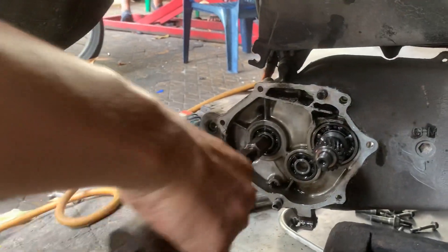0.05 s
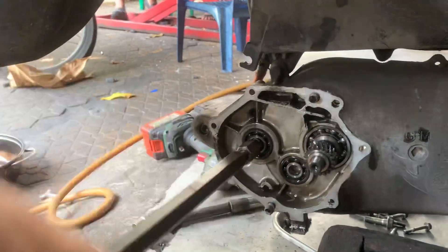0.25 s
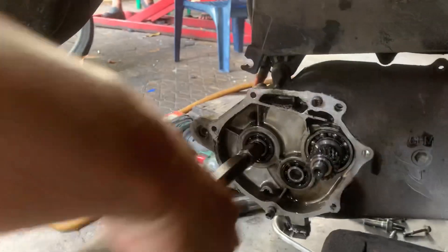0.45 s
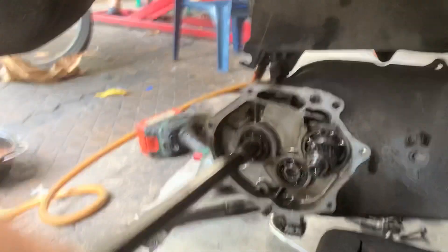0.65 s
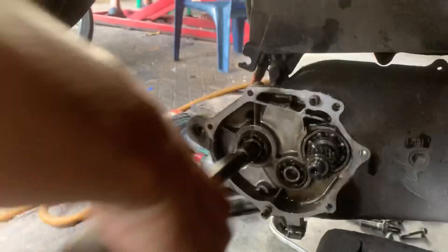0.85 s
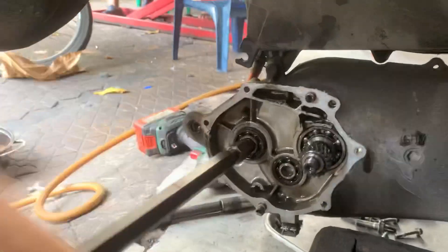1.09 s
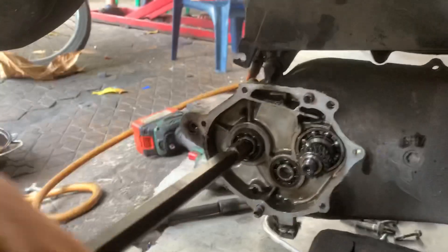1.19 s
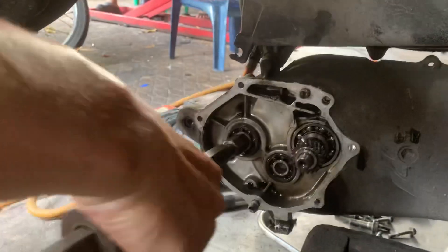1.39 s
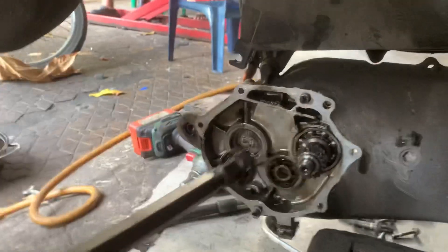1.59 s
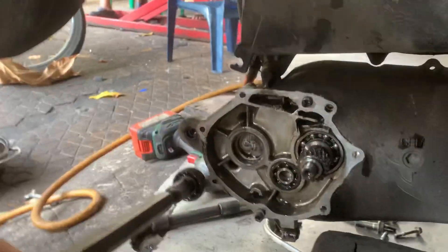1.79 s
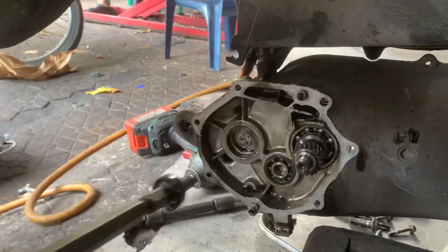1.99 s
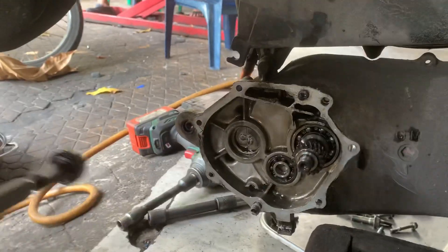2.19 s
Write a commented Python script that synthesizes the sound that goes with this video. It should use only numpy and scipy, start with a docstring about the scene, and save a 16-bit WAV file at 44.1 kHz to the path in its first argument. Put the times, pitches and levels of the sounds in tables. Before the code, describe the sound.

Four steel clangs of a slide hammer on an engine casing, with sliding scrapes between.

```python
"""A slide hammer pulls a bearing from an aluminium engine casing in four blows, close by in a workshop.
The steel weight scrapes along its rod by sliding friction and cracks against its stop; each impact
drives the damped modes of rod, casing and engine mounts: a clang, a rattle and a thud.
Between blows the weight slides back and the loose puller knocks and clinks; at last the freed bearing
jingles. The room reverberates over a low hum."""
import sys
import numpy as np
from scipy import signal
from scipy.fft import rfft, irfft
from scipy.io import wavfile
from scipy.ndimage import uniform_filter1d

SR = 44100
rng = np.random.default_rng(int(sys.argv[2]) if len(sys.argv) > 2 else 0)


def master_out(mix):
    """Clip the mix to full scale and print it as 16-bit PCM to the path in sys.argv[1]."""
    frames = np.transpose(np.atleast_2d(mix))
    ceiling = np.clip(frames, -1, 1)
    pcm = np.round(ceiling * 32767).astype(np.int16)
    wavfile.write(sys.argv[1], SR, pcm)


N = 99225
T = np.arange(N) / SR

# impacts on the stop: (time [s], crack [dB], swell before it [dB], clang [dB], clang t60 [s],
# rattle [dB], rattle t60 [s], casing ring [dB], thud [dB], casing rise time [s])
BLOWS = [(0.243, -11, -10, -11.5, 0.034, -11.5, 0.03, -20, -14.5, 0.0022),
         (0.64, -12.5, -10.5, -7.5, 0.044, -25.5, 0.062, -33, -19, 0.0014),
         (1.0950, -10, -25.5, -12, 0.084, -28, 0.07, -22.5, -45, 0.01),
         (1.4993, -10, -16.5, -14.5, 0.057, -35, 0.066, -30.5, -29.5, .002)]
# spectra of a blow's crack, clang and rattle: (frequency [Hz], level [dB])
CRACK_SPECTRUM = [(40, -45.5), (200, -36), (1500, -17), (4000, -6), (7000, -9.5), (8500, 13), (9500, 0),
                  (11000, 5), (11900, -25), (14000, -3), (16000, -20)]
CLANG_SPECTRUM = [(40, -42), (150, -14), (700, -3.5), (1600, -4.5), (2400, 1), (3700, 1), (7000, 0),
                  (8500, 3), (9400, -12.5), (11000, -14), (11900, -24.5), (14000, -13), (16000, -26.5)]
RATTLE_SPECTRUM = [(30, -27.5), (70, -16), (200, -10), (420, 6.5), (650, 1.5), (900, 5.5), (1200, 9),
                   (1500, -5), (1900, 1), (3000, -6.5), (8000, -31.5)]
# modes of rod and weight, casing, engine on its mounts, bearing: (frequency [Hz], level [dB], t60 [s])
ROD_MODES = [(1190, -8.5, .04), (1606, -13, .04), (2464, -1.5, .06), (2690, -4.5, 0.04), (3620, 0.5, 0.064),
             (3730, 4, 0.062), (3815, -2, 0.075), (5090, -9.5, .04), (5800, -4.5, 0.084), (6270, -8, 0.12),
             (6840, -5.5, 0.046), (8300, -3.5, .04), (8560, -6.5, .045)]
CASING_MODES = [(190, -4.5, 0.04), (308, -5, 0.092), (525, -5, 0.05), (881.4, 3, 0.047), (1250, -9.5, 0.06),
                (1896, -1.5, 0.059), (2716, -5, 0.06)]
MOUNT_MODES = [(129, -4, 0.034), (185, -1.5, 0.043), (287, 2.5, 0.034), (498.6, -10, 0.038)]
BEARING_MODES = [(1680, -14.5, .05), (2445, 0, 0.059), (2537, 0, 0.073), (3152, -11, 0.0324),
                 (4580, -9, 0.044)]
# friction of weight on rod, one envelope a stroke: (time [s], level [dB])
STROKES = [
    [(0, -50), (.04, -44), (.06, -53), (.1, -41.5), (.145, -61.5), (.19, -31), (.21, -31.5), (.238, -26)],
    [(.415, -71), (.44, -29.5), (.455, -45.5), (.472, -30), (.5, -45), (.53, -52), (.56, -62.5),
     (.59, -36.5), (.636, -24.5)],
    [(.82, -54.5), (.845, -48.5), (.87, -45), (.9, -42), (.95, -74.5), (.98, -50), (1.02, -46.5),
     (1.06, -48), (1.09, -42)],
    [(1.17, -51.5), (1.215, -43), (1.25, -57), (1.32, -46.5), (1.345, -58.5), (1.365, -39.5), (1.405, -67),
     (1.445, -45.5), (1.49, -44)],
]
# wavering metal tones: (centre time [s], half duration [s], frequency [Hz], bandwidth [Hz], level [dB])
METAL_TONES = [(0.203, 0.0294, 1519, 200, -41.5), (0.2225, 0.00763, 3695, 60, -21),
               (0.197, 0.01635, 3650, 100, -38.5), (0.444, 0.0082, 3570, 120, -29),
               (0.468, 0.027, 1201, 170, -34.5), (0.473, 0.039, 2457, 59.06, -39),
               (0.613, 0.03, 2473, 89.93, -33), (0.622, 0.014, 3700, 150, -28.5),
               (0.85, 0.055, 849, 60, -46.5), (0.851, 0.014, 3977, 110, -35.5),
               (0.877, 0.025, 2780, 250, -42.5), (1.025, 0.027, 833, 99.3, -46.5),
               (1.112, .013, 883, 45.1, -25), (1.109, .008, 1540, 40.1, -27),
               (1.32, 0.019, 3870, 108.2, -47.5), (1.361, 0.012, 2620, 130, -40)]
# contacts of the loose weight and jaws: (time [s], level [dB], t60 [s])
CLINKS = [(0.099, -60, 0.035), (0.188, -45, .04), (0.217, -27.5, 0.054), (0.442, -29.5, 0.0127),
          (0.459, -41, 0.014), (0.587, -35, 0.049), (0.611, -26.5, 0.043), (0.839, -32.5, 0.064),
          (0.864, -43, 0.047), (0.916, -41.5, 0.036), (0.979, -52, .04), (1.004, -41, 0.07),
          (1.0759, -22.5, 0.025), (1.175, -43, .025), (1.21, -44, .06), (1.278, -38, 0.045),
          (1.360, -43, .04), (1.467, -32, 0.09), (1.475, -29.5, 0.04)]
# jaws striking the casing: (time [s], level [dB], pitch factor [1])
KNOCKS = [(0.7744, -29.5, 0.91), (1.113, -21.5, 0.98), (1.3744, -26.5, 0.98)]
# freed bearing striking the puller: (time [s], level [dB])
JINGLES = [(1.604, -52), (1.657, -66), (1.673, -49), (1.6852, -45.5), (1.738, -56.5)]
# envelope of the engine's grumble: (time [s], level [dB])
GRUMBLE_ENVELOPE = [(0, -53.5), (0.3, -52.5), (0.4, -56), (0.6, -48.5), (0.72, -59), (0.95, -52),
                    (1.2, -51.5), (1.4, -63), (1.6, -72)]
# spectra of the lesser noises and the reverberation: (frequency [Hz], level [dB])
SCRAPE_SPECTRUM = [(100, -15.5), (450, -16.5), (650, -8.5), (900, 2.5), (1400, 4), (2000, -2.5), (2600, 2),
                   (3800, -9.5), (4600, -7.5), (7000, -14), (8600, -15), (9600, -23), (11100, -17),
                   (12000, -48), (14200, -22.5), (16000, -51.5)]
CLINK_SPECTRUM = [(200, -14), (900, -9.5), (2500, 0), (3800, 3), (5000, -3), (8500, -5.5), (9600, -17),
                  (11100, -9), (12000, -36), (14200, -21.5), (16000, -29.5)]
KNOCK_SPECTRUM = [(60, -31.5), (140, -11), (300, 3.5), (680, -4.5), (870, -0.5), (1200, 9.5), (1500, -5.5),
                  (1870, -15), (2800, -21), (6000, -18.5), (12000, -51.5)]
GRUMBLE_SPECTRUM = [(25, -20), (70, 3), (140, 1.5), (220, -7.5), (320, -3.5), (450, -16.5), (850, -3),
                    (1600, -31.5), (5000, -50.5)]
RUMBLE_SPECTRUM = [(25, -19.5), (102, -7), (130, -17), (206, -12.5), (249, -27.5), (285, -22.5), (405, -31),
                   (476, -24.5), (660, -30), (8360, -41), (16000, -60)]
ROOM_SPECTRUM = [(100, -23.5), (500, -23), (1000, -24.5), (2500, -22), (3700, -24.5), (6000, -26),
                 (7500, -31.5), (8500, -24.5), (11000, -28), (12000, -41), (14000, -22.5), (15500, -43.5)]
# reverberation time of the workshop: (frequency [Hz], t60 [s])
ROOM_T60 = [(100, 0.4), (500, 0.85), (2500, 1.03), (8500, 0.82), (12000, 0.44)]
# partials of the hum: (frequency [Hz], level [dB])
HUM_PARTIALS = [(97, -65.5), (199, -72.5)]
# level difference between the channels: (frequency [Hz], left minus right [dB])
BALANCE = [(100, -2.5), (700, -3), (1100, 4.5), (1500, -1.5), (4000, 0.5), (6200, -6.5), (8500, -2.5),
           (15000, 0.5)]
# phase difference of the ringing parts: (frequency [Hz], left lead [rad])
RING_PHASE = [(300, -0.055), (900, 1.1), (1200, -1.2), (1870, -1.1), (2460, -1.6), (2690, 1.5), (3700, 1.1),
              (8300, 0.62)]

CRACK_T60_S, SNAP_S, SNAP_DB = 0.035, 0.0023, -1.5
SWELL_RISE_S, CLANG_RISE_S, CLINK_RISE_S = 0.0052, 0.001, 0.0017
THUD_DELAY_S, THUD_CUT_HZ = 0.0018, 92
ROD_BLOW_DB, ROD_SLIDE_DB, ROD_CLINK_DB = -8, -9, -6.5
CATCHES_PER_S, SCRAPE_DB, GRIT_DB, GRIT_S = 3600, -4.5, 3.2, 0.003
FLUTTER_DEPTH, FLUTTER_S = 0.47, 0.0036
KNOCK_TONE_DB, KNOCK_NOISE_DB, JINGLE_NOISE_DB = -8.5, -2.5, -5
ECHO_S, ECHO_SPREAD_S, ECHO_DB = 0.043, 0.02, -23.5
RUMBLE_DB, HUM_WAVER = -57.5, 0.16
# delays of the right channel behind the left
PAIR_LAG_S, CASING_LAG_S, CRACK_LAG_S, TREBLE_LAG_S = 0.0004255, 0.00022, -0.00032, -0.000295
TREBLE_HZ, LOW_CUT_HZ, HIGH_CUT_HZ = 8000, 21, 16200


def hammer_blows():
    """Impact excitation: a brief noisy swell rises to a crack; steel clangs, casing rattles and thuds."""
    crack, clang, rattle, shake, thud = np.zeros((5, N))
    for (s, crack_db, swell_db, clang_db, clang_t60,
         rattle_db, rattle_t60, ring_db, thud_db, rise_s) in BLOWS:
        t = T - s
        snap = amp(SNAP_DB) * (t >= 0) * np.exp(-(t / SNAP_S) ** 2) / 2
        crack += amp(crack_db) * (amp(-3) * decay(t, CRACK_T60_S) + snap)
        clang += amp(swell_db) * np.exp(-abs(t) / np.where(t < 0, SWELL_RISE_S, CLANG_RISE_S))
        clang += amp(clang_db) * decay(t, clang_t60) * (1 - np.exp(-np.maximum(t, 0) / CLANG_RISE_S))
        jolt = np.clip(t / rise_s, 0, 1) ** 2 * decay(np.maximum(t - rise_s, 0), rattle_t60)
        rattle += amp(rattle_db) * jolt
        shake += amp(ring_db) * jolt
        for hz, db, t60 in MOUNT_MODES:
            thud += amp(thud_db + db) * damped_sine(t - THUD_DELAY_S, hz, t60)
    steel = colour(crack * stereo_noise(0.94, CRACK_LAG_S), CRACK_SPECTRUM)
    steel += colour(clang * stereo_noise(), CLANG_SPECTRUM)
    steel += amp(ROD_BLOW_DB) * resonate(clang * stereo_noise(lag_s=0), ROD_MODES)
    casing = colour(rattle * stereo_noise(0.51, CASING_LAG_S), RATTLE_SPECTRUM)
    casing += resonate(shake * rng.standard_normal(N), CASING_MODES)
    engine = stereo(highpass(thud, THUD_CUT_HZ), lag_s=CASING_LAG_S)
    return steel + casing + engine


def weight_scrapes():
    """Sliding friction: tiny random catches between weight and rod excite the rod's modes."""
    level = sum(amp(np.interp(T, *np.transpose(stroke), left=-200, right=-200)) for stroke in STROKES)
    catches = unit_rms(rng.standard_normal((3, N)) * (rng.random((3, N)) < CATCHES_PER_S / SR))
    grit = unit_rms(uniform_filter1d(rng.standard_normal(N), round(GRIT_S * SR)))
    force = level * unit_rms(amp(GRIT_DB * grit))
    scrape = colour(force * stereo(catches[0], catches[1:], coherence=0.29), SCRAPE_SPECTRUM)
    rod = resonate(colour(force * catches[0], SCRAPE_SPECTRUM), ROD_MODES)
    return amp(SCRAPE_DB) * scrape + amp(ROD_SLIDE_DB) * rod


def metal_tones():
    """Brief, randomly modulated resonances: sliding squeals and the third blow's hollow clank."""
    out = np.zeros((2, N))
    for s, half_s, hz, width_hz, db in METAL_TONES:
        near = abs(T - s) < np.pi * half_s
        jitter, flutter = rng.standard_normal((2, N))[:, near]
        # a random walk in phase broadens the spectral line
        phase = np.cumsum(uniform_filter1d(jitter, size=32)) * np.sqrt(2 * np.pi * width_hz / SR)
        flutter = unit_rms(uniform_filter1d(flutter, round(FLUTTER_S * SR)))
        swell = amp(db) * np.exp(-((T[near] - s) / half_s) ** 2)
        out[:, near] += swell * (1 + FLUTTER_DEPTH * flutter) * partial(T[near], hz, phase)
    return out


def puller_clinks():
    """Brief steel-on-steel contacts give broadband forces that set the rod in free vibration."""
    force = sum(amp(db) * np.where(T < s, np.exp(-abs(T - s) / CLINK_RISE_S), decay(T - s, t60))
                for s, db, t60 in CLINKS)
    contact = colour(force * stereo_noise(), CLINK_SPECTRUM)
    return contact + amp(ROD_CLINK_DB) * resonate(force * stereo_noise(lag_s=0), ROD_MODES)


def jaw_knocks():
    """Modal superposition: the jaws shift in their seat and sound the casing's damped modes."""
    tone = np.zeros(N)
    for s, db, pitch in KNOCKS:
        for k, (hz, mode_db, t60) in enumerate(CASING_MODES):
            tone += (-1) ** k * amp(db + mode_db) * damped_sine(T - s, hz * pitch, t60)
    burst = sum(amp(db) * decay(T - s, t60=0.055) for s, db, _ in KNOCKS) * stereo_noise(0.59)
    return amp(KNOCK_TONE_DB) * stereo(tone) + amp(KNOCK_NOISE_DB) * colour(burst, KNOCK_SPECTRUM)


def bearing_jingles():
    """Free vibration: the loose bearing ticks against the tool and rings at its natural frequencies."""
    burst = sum(amp(db) * decay(T - s, t60=0.043) for s, db in JINGLES) * stereo_noise()
    tone = sum(amp(db + mode_db) * decay(T - s, t60) * partial(T - s, hz, 0)
               for s, db in JINGLES for hz, mode_db, t60 in BEARING_MODES)
    return tone + amp(JINGLE_NOISE_DB) * colour(burst, CLINK_SPECTRUM)


def engine_grumble():
    """Forced vibration: the engine radiates low noise as it is tugged about."""
    level = amp(np.interp(T, *np.transpose(GRUMBLE_ENVELOPE)))
    return level * colour(stereo_noise(0.9), GRUMBLE_SPECTRUM)


def wall_echo(x):
    """Scattering at a wall spreads one reflection over time."""
    taps = rng.standard_normal((2, SR // 4)) * np.exp(-((T[:SR // 4] - ECHO_S) / ECHO_SPREAD_S) ** 2)
    return amp(ECHO_DB) * convolve(x, taps / np.linalg.norm(taps[0]))


def reverberation(x, tails=3):
    """A diffuse field decays at its own rate in each band; crossfaded tails avoid fixed ringing."""
    out = np.zeros((2, N))
    onset = np.clip(T[:SR // 2] / 0.01, 0, 1)
    for k in range(tails):
        hz, t, bands = signal.stft(rng.standard_normal((2, SR)), SR, nperseg=256)
        t60 = lookup(ROOM_T60, hz)[:, None]
        gain = amp(lookup(ROOM_SPECTRUM, hz))[:, None] * np.sqrt(2 * np.log(1000) / (t60 * SR))
        tail = signal.istft(bands * decay(t, t60) * gain, SR, nperseg=256)[1][:, :SR // 2]
        crossfade = np.cos(2 * np.pi * T + np.pi * k / tails) * np.sqrt(2 / tails)
        out += convolve(x * crossfade, tail * onset)
    return out


def workshop_hum():
    """Slow amplitude and phase modulation makes a hum waver over a low rumble."""
    hum = np.zeros(N)
    for hz, db in HUM_PARTIALS:
        drift = np.interp(T, np.linspace(0, T[-1], 30), rng.standard_normal(30))
        hum += amp(db) * np.sqrt(2) * (1 + HUM_WAVER * drift) * np.sin(2 * np.pi * hz * T + drift)
    return hum + amp(RUMBLE_DB) * unit_rms(colour(stereo_noise(0.3), RUMBLE_SPECTRUM))


def amp(db):
    """Amplitude ratio of a level in decibels."""
    return 10 ** (np.asarray(db) / 20)


def unit_rms(x):
    """Normalisation to unit power."""
    return x / np.sqrt(np.mean(x ** 2) + 1e-20)


def lookup(points, hz):
    """Interpolation on a log-frequency axis."""
    f, value = np.transpose(points)
    return np.interp(np.log(hz + 1), np.log(f + 1), value)


def convolve(x, response):
    """Linear response of each channel, by convolution."""
    return signal.oaconvolve(np.atleast_2d(x), np.atleast_2d(response), axes=1)[:, :N]


def highpass(x, hz):
    """Second-order attenuation below a cutoff."""
    return signal.sosfilt(signal.butter(2, hz, "high", fs=SR, output="sos"), x)


def colour(x, spectrum, size=4096):
    """Spectral shaping by a causal filter of unit energy."""
    log_gain = np.log(amp(lookup(spectrum, abs(np.fft.fftfreq(size, 1 / SR)))))
    response = np.fft.ifft(np.exp(np.conj(signal.hilbert(log_gain)))).real[:size // 2]
    return convolve(x, response / np.linalg.norm(response))


def decay(t, t60):
    """Exponential damping from t = 0, by 60 dB in t60 seconds."""
    return (t >= 0) * np.exp(-np.log(1000) * np.clip(t / t60, 0, 10))


def damped_sine(t, hz, t60):
    """Impulse response of a damped oscillator."""
    return decay(t, t60) * np.sin(2 * np.pi * hz * t)


def partial(t, hz, phase):
    """One resonance reaches the two microphones with a phase difference."""
    return np.sin(2 * np.pi * hz * t + phase - np.array([[0], [1]]) * lookup(RING_PHASE, hz))


def resonate(force, modes):
    """Forced response of damped modes with random phases."""
    t = T[:SR // 5]
    response = sum(amp(db) * decay(t, t60) * partial(t, hz, rng.uniform(0, 2 * np.pi))
                   for hz, db, t60 in modes)
    return convolve(force, response / np.linalg.norm(response[0]))


def stereo(direct, diffuse=0, coherence=1, lag_s=PAIR_LAG_S):
    """Path difference offsets the direct sound, the treble by its own lag; the rest is diffuse."""
    hz = np.fft.rfftfreq(N, 1 / SR)
    delay = np.where(hz < TREBLE_HZ, lag_s, TREBLE_LAG_S)
    right = irfft(rfft(direct) * np.exp(-2j * np.pi * hz * delay), N)
    return np.sqrt(coherence) * np.array([direct, right]) + np.sqrt(1 - coherence) * diffuse


def stereo_noise(coherence=0.4, lag_s=PAIR_LAG_S):
    """Partly coherent white noise, as from dense random contact forces."""
    return stereo(rng.standard_normal(N), rng.standard_normal((2, N)), coherence, lag_s)


def scene():
    """Superposition of the tool's direct sound, its reflections and the background."""
    tool = hammer_blows() + weight_scrapes() + metal_tones() + engine_grumble()
    tool += puller_clinks() + jaw_knocks() + bearing_jingles()
    balance_db = lookup(BALANCE, np.fft.rfftfreq(N, 1 / SR))
    tool = irfft(rfft(tool) * amp(np.array([balance_db, -balance_db]) / 2), N)
    return tool + wall_echo(tool) + reverberation(tool) + workshop_hum()


def record(dry):
    """The microphones drop the deep bass; soft saturation rounds the peaks; a low-pass limits the band."""
    dry = highpass(dry, LOW_CUT_HZ)
    soft = dry / (1 + dry ** 4) ** (1 / 4)
    lowpass = signal.firwin(255, HIGH_CUT_HZ, window=("kaiser", 9), fs=SR)
    return signal.oaconvolve(soft, lowpass[None], "same")


dry = scene()
out = record(dry)
master_out(out)
```